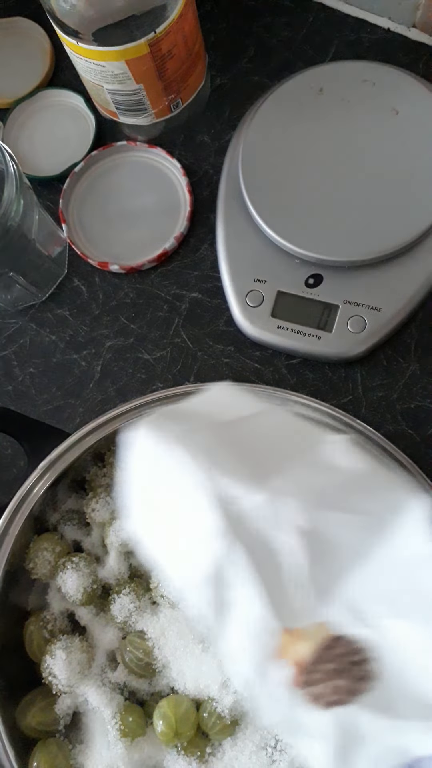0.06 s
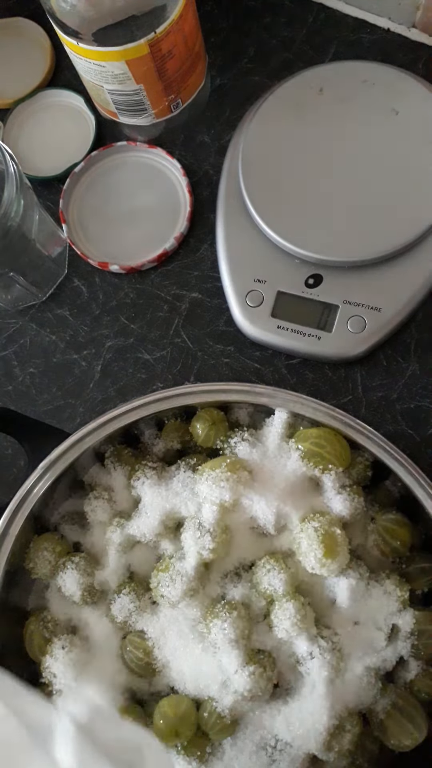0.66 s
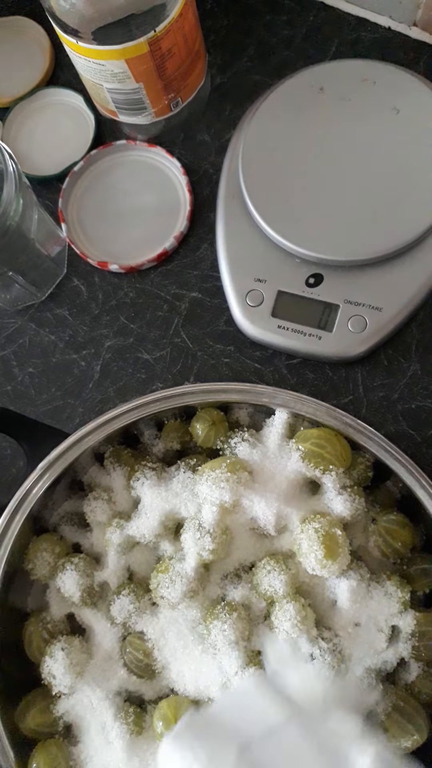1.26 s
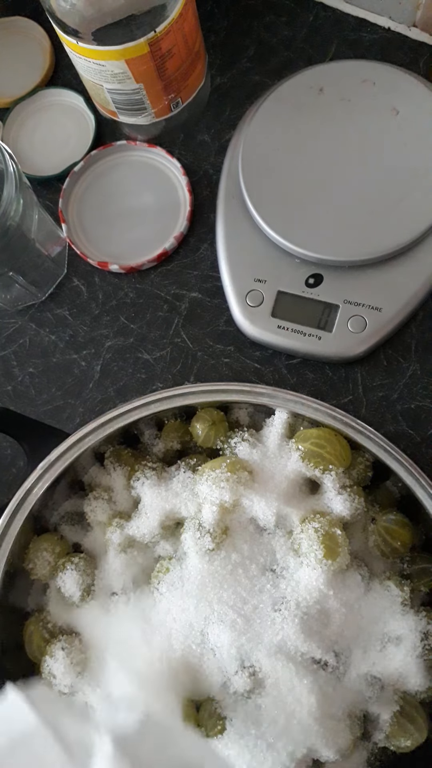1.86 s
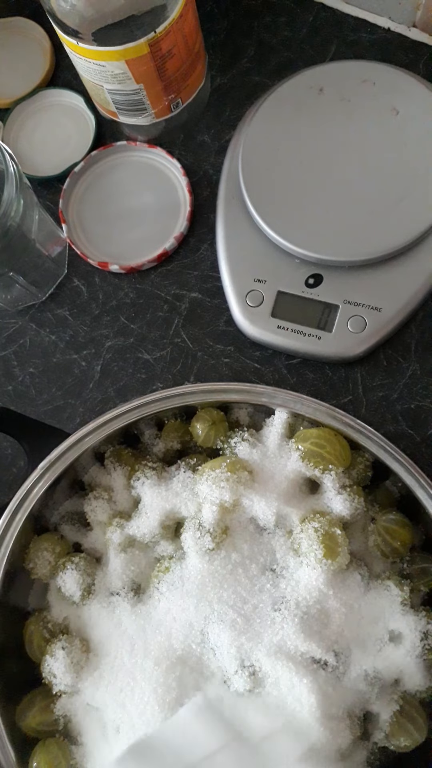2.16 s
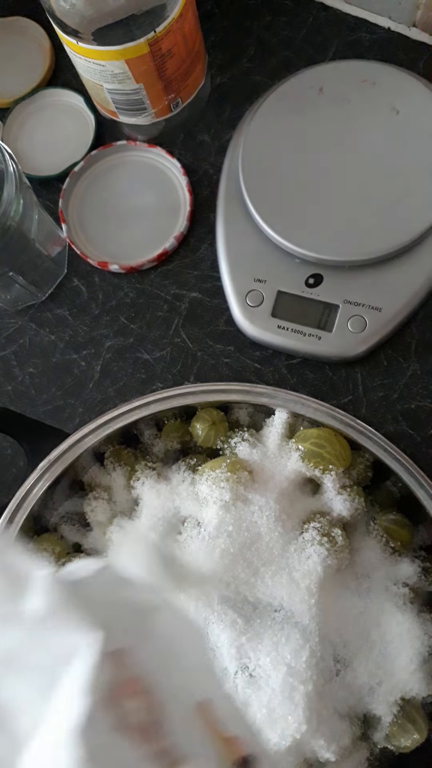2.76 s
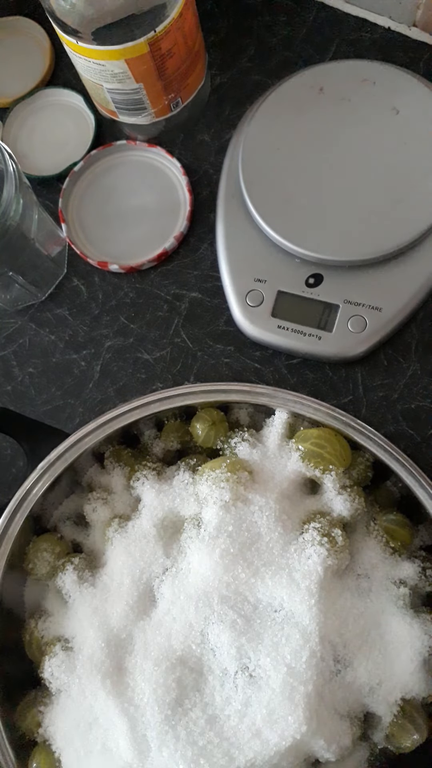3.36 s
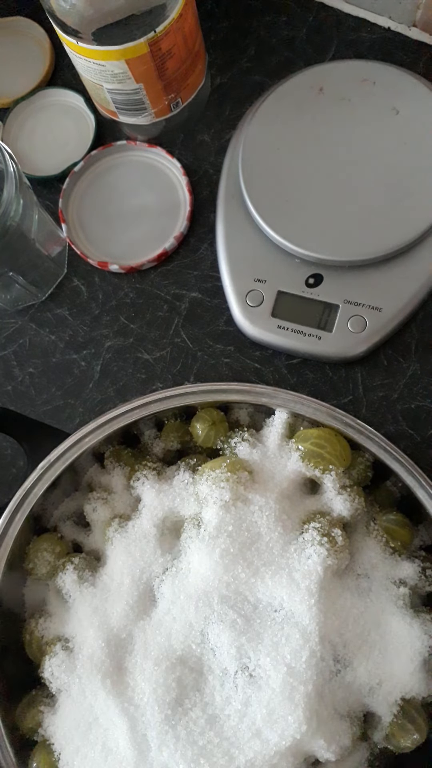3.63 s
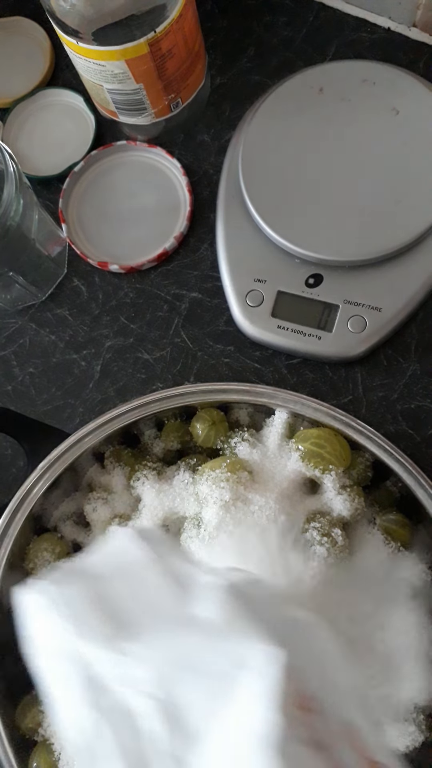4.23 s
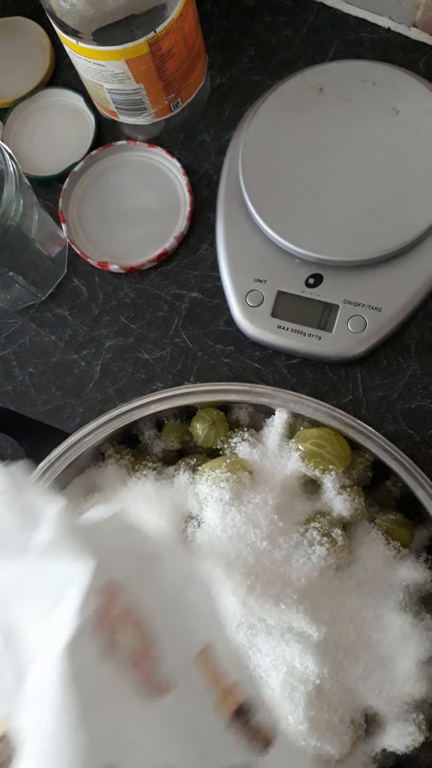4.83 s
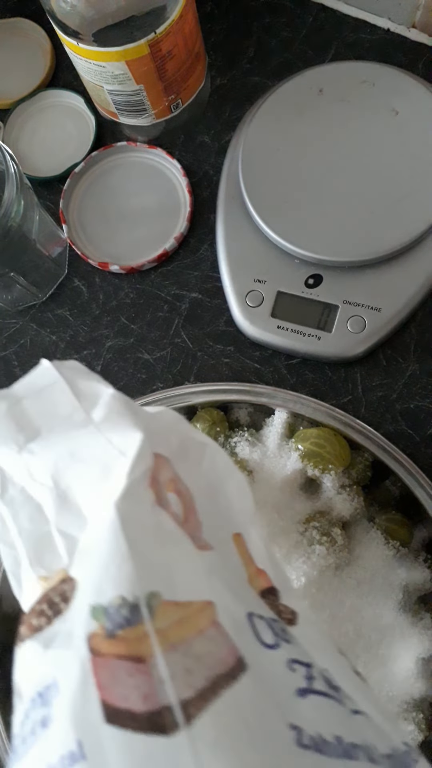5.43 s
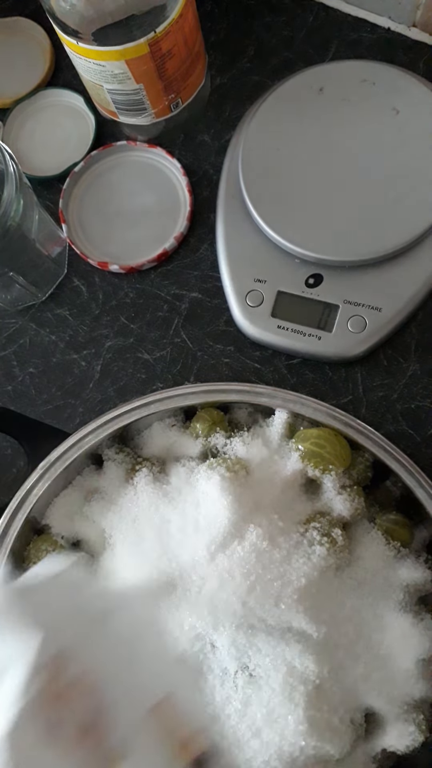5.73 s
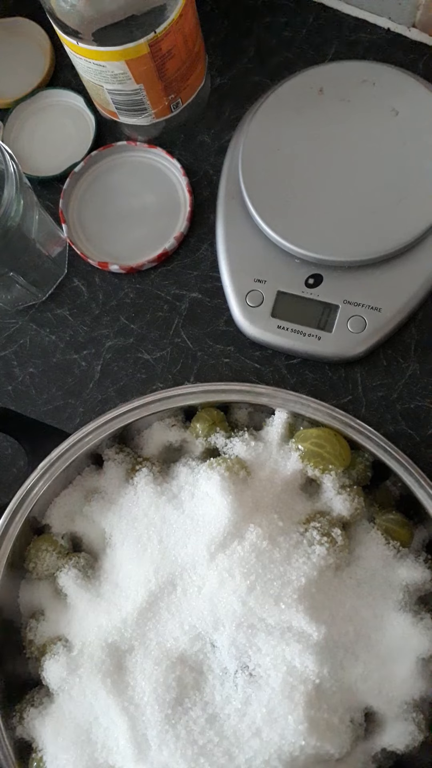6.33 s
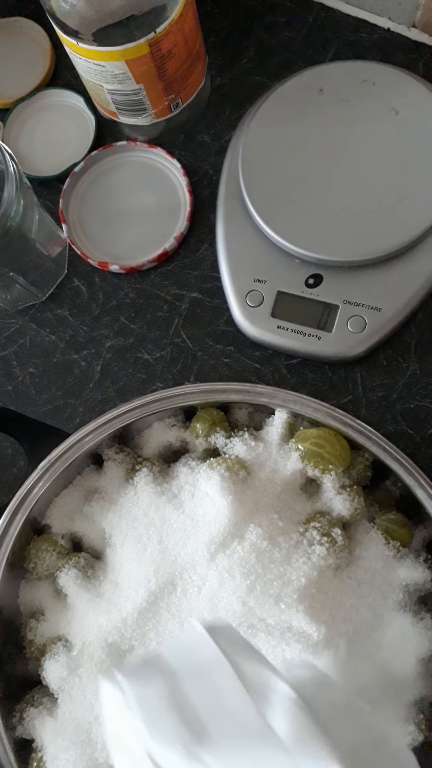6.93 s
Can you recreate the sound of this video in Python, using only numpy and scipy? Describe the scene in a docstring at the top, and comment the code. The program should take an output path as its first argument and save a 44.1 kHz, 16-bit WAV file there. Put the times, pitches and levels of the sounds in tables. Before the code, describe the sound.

In a quiet kitchen, a close stereo microphone picks up sugar being poured from a paper bag over fruit in a saucepan. The crystals hiss along the rustling paper and land with a fine, grainy patter, rising and falling in several waves. Past the middle, the bag is shaken with a run of crisp crackles before the sugar rushes out again. A distant motor hum is barely audible underneath.

```python
"""A quiet kitchen, with a stereo microphone close to a steel saucepan of gooseberries.
Granulated sugar is poured in from a paper bag in four surges: crystals hiss along the paper, land on
the heap and patter on the fruit. The air in the pan colours the stream, hollower when the bag hangs
over it. The bag rustles, crackles and bumps as it is tipped; far off, a faint motor hums."""
import sys
import numpy as np
from scipy import signal
from scipy.fft import rfft, irfft, next_fast_len
from scipy.io import wavfile

SR = 44100
rng = np.random.default_rng(int(sys.argv[2]) if len(sys.argv) > 2 else 0)


def wrap_up_sound(samples):
    """Save the sound to the file named by the first command line argument, as 16-bit audio."""
    columns = np.atleast_2d(samples).T
    # keep every value between -1 and 1, then stretch to whole-number steps
    tamed = np.clip(columns, -1, 1)
    steps = np.round(tamed * 32767).astype(np.int16)
    wavfile.write(sys.argv[1], SR, steps)


N = 312669
TIME = np.arange(N) / SR
FFT_SIZE = next_fast_len(N, real=True)
HZ = np.maximum(np.fft.rfftfreq(FFT_SIZE, 1 / SR), 1)


def from_db(db):
    """Decibels to gain."""
    return 10 ** (np.asarray(db) / 20)


def rms_one(x):
    """Scale to an rms of 1."""
    return x / np.sqrt(np.mean(x ** 2) + 1e-20)


def in_time(rows):
    """Each column of a curve at every sample."""
    seconds, *columns = np.transpose(rows)
    return [np.interp(TIME, seconds, column) for column in columns]


def in_hz(rows, column=1):
    """One column of a spectrum at every frequency."""
    table = np.array(rows)
    return np.interp(np.log(HZ), np.log(table[:, 0]), table[:, column])


def drift(per_s):
    """A slow random wander; rms 1."""
    knots = rng.standard_normal(4000)
    return rms_one(np.interp(2 * per_s * TIME, np.arange(len(knots)), knots))


def swell(centre_s, half_s):
    """A smooth rise and fall of height 1 around a moment."""
    return np.exp(-((TIME - centre_s) / half_s) ** 2)


def panned(x, side_db):
    """Place a sound with the left side_db above the right."""
    return x * from_db(np.vstack([side_db / 2, -side_db / 2]))


def at_microphone(pair, *responses):
    """Two unrelated signals become one sound field at the two ports, once for each response; rms 1."""
    # Each row: frequency in Hz, likeness of the ports from 0 to 1, lag of the left in radians.
    ports = [(40, 1, 1.5), (250, 0.27, 0), (593, .8, 0.72), (741, 1, 1.39), (960, 0.25, 3), (1340, 0, 3),
             (1780, 0.43, 2), (1920, 0.21, 3.5), (2750, 0.05, 4), (3760, 0, 3.5), (16000, 0, 1.5)]
    # Each row: frequency in Hz, left over right in dB.
    balance = [(150, 1), (350, -5.5), (550, -4), (780, 3), (1130, -6), (1800, -0.4), (4500, -1),
               (5200, -1.5), (5600, 3.5), (6300, -1.2), (7600, -2.1), (9300, 5), (12000, -1), (16000, -0.5)]
    alike, lag = np.clip(in_hz(ports), 0, 1), in_hz(ports, column=2)
    mid, side = rfft(pair, FFT_SIZE)
    mid, side = np.sqrt(1 + alike) * mid, np.sqrt(1 - alike) * side
    left, right = (mid + side) * np.exp(-1j * lag), mid - side
    field = panned(np.array([left, right]), in_hz(balance))
    return [rms_one(irfft(field * response, FFT_SIZE)[:, :N]) for response in responses]


def coloured(pair, colour):
    """A sound field at the microphone with one steady spectrum; rms 1."""
    return at_microphone(pair, from_db(in_hz(colour)))[0]


def room_tone(level_db):
    """The kitchen's own steady, low noise."""
    # Each row: frequency in Hz, relative level in dB.
    room_colour = [(20, -7), (45, -20), (70, 2), (140, 2), (250, -8), (500, -11), (1200, -18),
                   (4000, -16.5), (16000, -27)]
    return from_db(level_db) * coloured(rng.standard_normal((2, N)), room_colour)


def sugar():
    """Crystals hiss in the bag, land more dully on the heap and, in a strong flow, patter on the fruit."""
    # The stream leaving the bag. Each row: time in seconds, dB against a full, steady pour.
    flow = [(0, -19), (.47, -21), (.86, -14.5), (1.09, 1), (1.24, 4.5), (1.6, -4.5), (1.98, -.5),
            (2.26, -13), (2.75, -11.5), (2.9, -9), (3.35, -7), (3.68, 0), (4, -2.5), (4.2, -.5), (4.6, -5),
            (4.8, -14), (4.95, -14), (5.13, -24), (5.28, -13), (5.36, -23.5), (5.49, -22.5), (5.56, -16),
            (5.68, -14), (5.83, -26), (6.02, -15), (6.5, 0), (7.09, 0.5)]
    # Crystals on paper, on sugar and on soft fruit. Each row: frequency in Hz, relative level in dB.
    slide_colour = [(30, -46), (200, -29.5), (1200, -46), (2200, -11), (3500, -0.5), (6000, -0.5),
                    (8000, 0), (9500, -3), (13000, -2.5), (16000, -6)]
    heap_colour = [(30, -48), (150, -20), (350, -16.5), (480, -20.5), (750, -6), (1000, -4.5), (1200, -4),
                   (1450, 2.5), (1800, 3), (2700, 2), (4000, -0.5), (6500, -4), (10000, -9.5),
                   (16000, -10.5)]
    fruit_colour = [(30, -50), (120, -23), (250, -11), (420, -9.5), (560, 2), (680, 5.5), (850, 1.5),
                    (1100, -11.5), (1600, -19), (4000, -24), (16000, -45)]
    emptying_db_per_s = 0.39  # the emptier the bag, the less sugar slides along its paper
    run_off_s = 0.059  # crystals take a moment to run off the heap onto the fruit
    open_side_db, covered_side_db = 0.1, 2.8  # the stream shifts left with the bag over the pan

    flow_db, = in_time(flow)
    _, skid_db = shaking()
    running_db = -40 + 0.74 * flow_db - emptying_db_per_s * TIME
    slide_db = 20 * np.log10(np.hypot(from_db(running_db), from_db(skid_db)))
    heap_db = -43 + 1.1 * flow_db
    fruit_db = -61 + 1.9 * np.interp(TIME - run_off_s, TIME, flow_db)

    on_paper = impacts(slide_db, per_s=150000, size_spread_db=3.0, clump_db=0.5, clumps_per_s=49)
    on_heap = impacts(heap_db, per_s=90000, size_spread_db=2.5, clump_db=1.0, clumps_per_s=25)
    on_fruit = impacts(fruit_db, per_s=25000, size_spread_db=0.5, clump_db=-3.7, clumps_per_s=16)
    hiss = from_db(slide_db) * in_pan(on_paper, slide_colour)
    landing = from_db(heap_db) * in_pan(on_heap, heap_colour)
    patter = from_db(fruit_db) * coloured(on_fruit, fruit_colour)
    stream = through_spout(hiss + landing, width_hz=380)
    side_db = open_side_db + (covered_side_db - open_side_db) * bag_cover()
    return panned(stream, side_db) + patter


def shaking():
    """Levels in dB of rustling paper and skidding crystals: each shake of the bag swells and dies away."""
    # Each row: centre and half-length in seconds, rustle and skid levels in dB.
    shakes = [(0.027, 0.17, -62, -48.5), (0.187, 0.026, -58, -48.5), (0.29, 0.11, -58, -50.5),
              (0.563, 0.38, -52, -52.5), (2.547, 0.3, -54, -52.5), (3.086, 0.35, -66, -48.5),
              (3.704, 0.43, -62, -43.5), (4.18, .1, -49, -51), (4.98, 0.18, -59, -58),
              (5.18, 0.17, -69, -55), (5.42, 0.12, -60, -60), (5.559, 0.03, -61, -50),
              (5.647, .055, -52, -49.5), (5.734, 0.09, -49, -52.5), (5.877, 0.034, -63, -52),
              (6.06, 0.12, -64, -50.5), (6.456, 0.24, -48, -43)]
    power = sum(np.outer(from_db([rustle_db, skid_db]), swell(centre_s, half_s)) ** 2
                for centre_s, half_s, rustle_db, skid_db in shakes)
    return 10 * np.log10(power + 1e-12)


def impacts(level_db, per_s, size_spread_db, clump_db, clumps_per_s):
    """Tiny uneven clicks in clumps; they crowd into a rush as the level rises, at most one a sample."""
    chance = np.clip(per_s * from_db(level_db - level_db.max()) / SR, 1e-4, 1)
    sizes = rng.standard_normal((2, N))
    sizes *= from_db(size_spread_db * np.clip(rng.standard_normal((2, N)), -2, 2))
    hits = rng.random((2, N)) < chance
    clumps = from_db(clump_db * drift(clumps_per_s))
    return sizes * hits / np.sqrt(chance) * clumps


def bag_cover():
    """How far the bag hangs over the pan, from 0 to 1."""
    # Each row: centre and half-length of a swing in seconds, share of the pan covered.
    swings = [(0.15, 0.53, 0.82), (2.506, 0.27, 0.46), (5.25, 0.6, 0.93), (6.1, 0.12, 0.24)]
    return np.clip(sum(cover * swell(centre_s, half_s) for centre_s, half_s, cover in swings), 0, 1)


def pan_air(covered):
    """Response of the saucepan: the direct sound plus its air modes, which dominate under the bag."""
    # Each row: resonance and width in Hz, level in dB with the pan open, then covered.
    air_modes = [(762, 127, 5, 14), (990, 23, -1.5, -32), (1539, 126, -15.5, 6), (1793, 40, -7, -4),
                 (2008, 56, -14, 12.5), (3350, 210, -11, -13), (4790, 190, -21, -1.5),
                 (5230, 390, -9, -4.5), (6890, 770, -19, -1), (7880, 740, -6, 2), (10800, 1650, -7.5, -4)]
    # Direct sound that gets past the covering bag. Each row: frequency in Hz, gain in dB.
    bag_shade = [(600, -2), (1150, -9.5), (1800, 8), (2600, 2), (3500, -1.5), (6000, -4.5), (9500, 1.5),
                 (16000, 2)]
    direct = from_db(in_hz(bag_shade)) if covered else 1
    resonance = 0
    for hz, width_hz, open_db, covered_db in air_modes:
        detuning = (HZ ** 2 - hz ** 2) / (HZ * width_hz)
        resonance += from_db(covered_db if covered else open_db) / (1 + 1j * detuning)
    return direct + resonance


def in_pan(clicks, colour):
    """The further the bag covers the pan, the hollower the clicks sound."""
    contact, cover = from_db(in_hz(colour)), bag_cover()
    bare, hollow = at_microphone(clicks, contact * pan_air(covered=False), contact * pan_air(covered=True))
    return (1 - cover) * bare + cover * hollow


def through_spout(stream, width_hz, block=256):
    """The air in the mouth of the bag rings, at a pitch that follows its changing shape."""
    # Each row: time in seconds, resonance in Hz, its level in dB over the direct sound.
    spout = [(0.35, 1990, -23), (.5, 3100, -19), (.65, 3140, -5), (1.7, 3200, -22), (2.5, 2630, 1.5),
             (2.7, 1940, -7), (2.9, 1760, -4), (3.5, 2660, -26), (5.4, 2700, -30), (5.56, 2700, -5),
             (5.87, 5100, -6), (6.03, 3900, -2), (6.2, 3880, 0), (6.35, 3300, -13)]
    hz, ring_db = in_time(spout)
    radius = np.exp(-np.pi * width_hz / SR)
    ringing, state = np.zeros_like(stream), np.zeros((2, 2))
    for i in range(0, N, block):
        poles = [1, -2 * radius * np.cos(2 * np.pi * hz[i] / SR), radius ** 2]
        ringing[:, i:i + block], state = signal.lfilter([1, 0, -1], poles, stream[:, i:i + block], zi=state)
    return stream + from_db(ring_db) * (1 - radius ** 2) / 2 * ringing


def bag_rustle():
    """Paper fibres give way in sparse, very bright ticks as the bag is shaken."""
    # Each row: frequency in Hz, relative level in dB.
    rustle_colour = [(30, -56), (1500, -38), (4000, -6), (8000, -43), (10500, 5), (12500, -1), (16000, 8)]
    level_db, _ = shaking()
    ticks = impacts(level_db, per_s=5000, size_spread_db=2.5, clump_db=2.0, clumps_per_s=90)
    return from_db(level_db) * coloured(ticks, rustle_colour)


def snap(centre_hz, crack_t60=0.019, tail_t60=0.11, tail_db=-22, band_ratio=1.74):
    """A crease gives way with a short crack, and pan and kitchen scatter it into a tail; peak 1."""
    t = TIME[:SR // 4]
    envelope = from_db(-60 * t / crack_t60) + from_db(tail_db - 60 * t / tail_t60)
    burst = rng.standard_normal((2, len(t))) * envelope
    edges_hz = [centre_hz / band_ratio, min(centre_hz * band_ratio, 0.45 * SR)]
    burst = signal.sosfilt(signal.butter(1, edges_hz, "band", fs=SR, output="sos"), burst)
    burst = signal.sosfilt(signal.butter(2, 1900, "high", fs=SR, output="sos"), burst)
    return burst / np.abs(burst).max()


def bag_crackle():
    """The paper snaps at its creases, and the air of the open pan colours each snap."""
    # Each row: start in seconds, level in dB ahead of the pan, left over right in dB, band centre in Hz.
    creases = [(0.304, -36.5, 10, 9000), (4.776, -40, 9, 7800), (4.949, -36.5, 3, 7000),
               (5.029, -41, -1, 7000), (5.0512, -34.5, -6, 6400), (5.109, -43, -7, 6000),
               (5.207, -39, 1.5, 9000), (5.539, -37, -4, 8040), (5.558, -37.5, -3, 4200),
               (5.614, -35, -4, 6000), (5.645, -39, -3, 9000), (5.6624, -32.5, -10, 10000),
               (5.7106, -32.5, -7.5, 11000), (5.750, -37, -12, 11600), (5.801, -36, -3, 10900),
               (5.868, -39, -10, 7500), (5.880, -38, -5.5, 7500), (6.085, -36, -5, 8300),
               (6.935, -39, -5, 3320)]
    snaps = np.zeros((2, N + SR))
    for start_s, level_db, side_db, centre_hz in creases:
        crack = panned(snap(centre_hz), side_db)
        start = round(start_s * SR)
        snaps[:, start:start + crack.shape[1]] += from_db(level_db) * crack
    return irfft(rfft(snaps, FFT_SIZE) * pan_air(covered=False), FFT_SIZE)[:, :N]


def distant_motor(waver_hz, rumble_db):
    """Only two low orders and a dull rumble come through the walls; the pitch sinks and settles."""
    # Each row: time in seconds, pitch in Hz, levels of the fundamental and its octave in dB.
    running = [(0, 63.9, -104, -110), (1.6, 64, -92, -88), (2.1, 60.5, -80, -87), (3.7, 52.8, -75.5, -86),
               (4.3, 54.4, -76.5, -77.5), (5.25, 54.9, -71.5, -79), (5.73, 54.6, -76, -87),
               (5.87, 54.6, -100, -87), (7.09, 54.5, -82, -74.5)]
    # Each row: frequency in Hz, relative level in dB.
    rumble_colour = [(30, -27), (90, 2), (170, 9.5), (230, -4), (350, -5.5), (500, -25), (1500, -46),
                     (16000, -70)]
    pitch_hz, fundamental_db, octave_db = in_time(running)
    phase = 2 * np.pi * np.cumsum(pitch_hz + waver_hz * drift(per_s=4.9)) / SR
    hum = np.sqrt(2) * (from_db(fundamental_db) * np.sin(phase) + from_db(octave_db) * np.sin(2 * phase))
    rumble = coloured(rng.standard_normal((2, N)), rumble_colour)
    return hum + from_db(fundamental_db + rumble_db) * rumble


def ring(clicks, hz, t60):
    """A unit click sets off a dying sine of height 1."""
    radius, angle = from_db(-60 / (t60 * SR)), 2 * np.pi * hz / SR
    poles = [1, -2 * radius * np.cos(angle), radius ** 2]
    return signal.lfilter([0, np.sin(angle)], poles, clicks + 1e-18)


def bag_bumps():
    """The bag bumps softly above the pan; each push rings a few low, short modes."""
    # Each row: start in seconds, strength of the push in dB.
    bumps = [(4.895, -60), (4.924, -54.5), (4.944, -61), (4.968, -65)]
    # Each row: frequency in Hz, gain in dB, seconds to fall by 60 dB.
    bump_modes = [(170, -5, 0.061), (292, -13, 0.047), (433, -1, 0.023), (814, 2.5, 0.03),
                  (1010, -8, 0.056)]
    pushes = np.zeros(N)
    for start_s, push_db in bumps:
        pushes[round(start_s * SR)] = from_db(push_db)
    return sum(from_db(db) * ring(pushes, hz, t60) for hz, db, t60 in bump_modes)


def scene():
    """Sugar and bag close to the microphone, over the kitchen's low background and the far motor."""
    room = room_tone(level_db=-74)
    close = sugar() + bag_rustle() + bag_crackle() + bag_bumps()
    return room + close + distant_motor(waver_hz=0.54, rumble_db=-4.5)


def record(dry):
    """The recorder cuts the top steeply."""
    cutoff_hz = 15850
    return signal.sosfilt(signal.ellip(12, 0.1, 70, cutoff_hz, fs=SR, output="sos"), dry)


dry = scene()
out = record(dry)
wrap_up_sound(out)
```